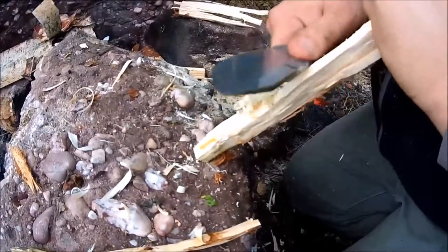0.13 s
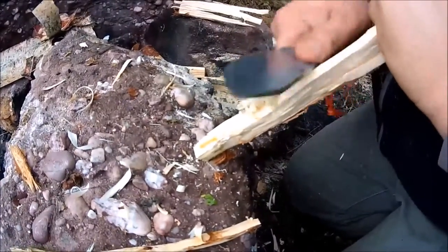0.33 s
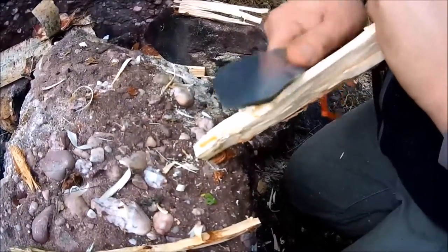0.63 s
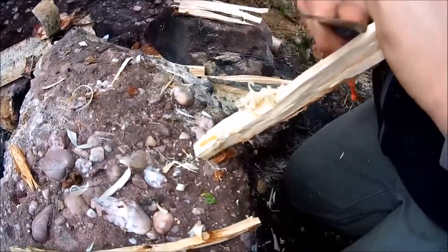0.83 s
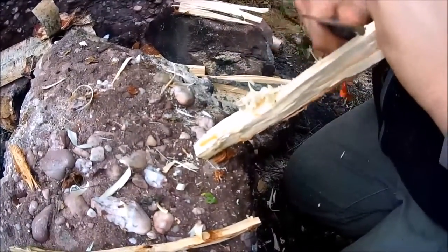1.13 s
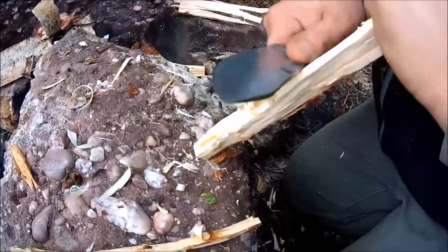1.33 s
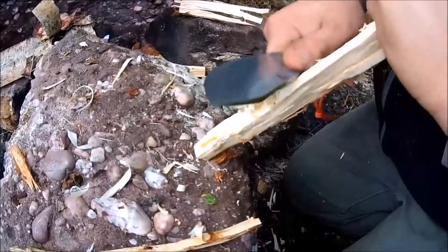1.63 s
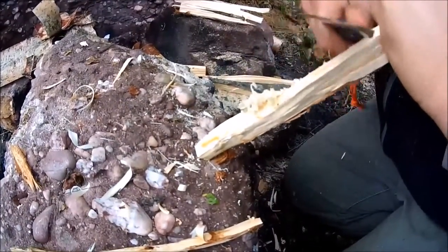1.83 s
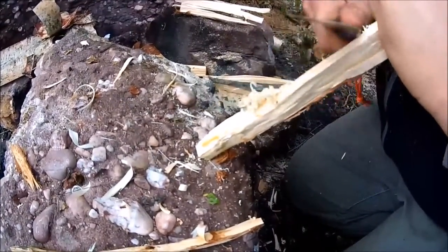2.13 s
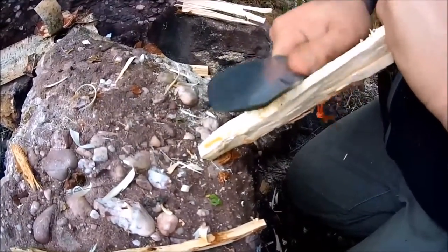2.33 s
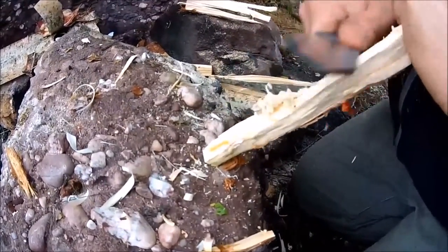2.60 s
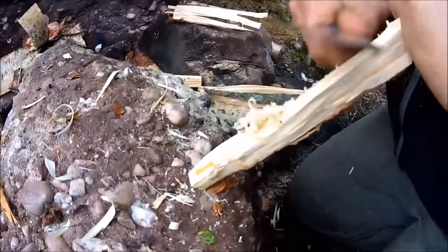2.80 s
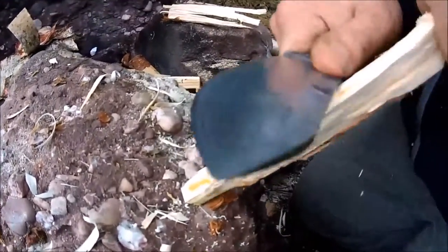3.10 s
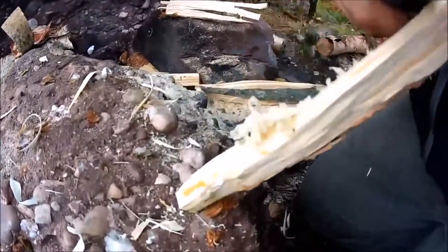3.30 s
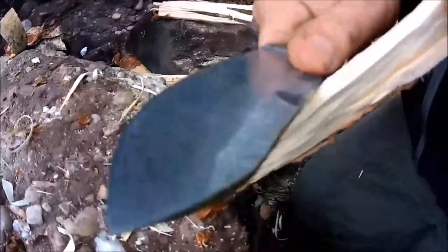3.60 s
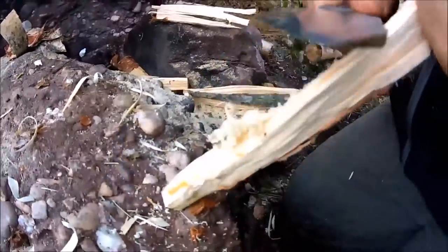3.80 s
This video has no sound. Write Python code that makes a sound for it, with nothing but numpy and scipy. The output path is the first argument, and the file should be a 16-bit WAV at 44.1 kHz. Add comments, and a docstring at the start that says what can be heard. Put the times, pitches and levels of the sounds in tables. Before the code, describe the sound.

Wood being whittled by a blade, quick dry scraping strokes close up, with a late sharp knock

```python
"""A knife shaves a wooden stick outdoors, about six strokes a second, close to the microphone.
Each stroke tears fibres: dense random clicks, coloured by filters, ring the wood and the blade, and flick off shavings.
Catches knock on the stick's damped modes, fibre bundles rip as short rasps, and the stick rocks on its stone.
Grip rustles, splinter snaps and faint air are shaped noise.
Near the end the blade knocks once, hard, and chatters: a noise crack, short modes and a low thump."""
import sys
import numpy as np
from scipy import signal
from scipy.fft import rfft, irfft
from scipy.io import wavfile
from scipy.ndimage import uniform_filter1d

SR = 44100
rng = np.random.default_rng(int(sys.argv[2]) if len(sys.argv) > 2 else 0)


def dump(signal):
    """Clip the signal to [-1, 1] and save it as 16-bit WAV at the path in sys.argv[1]."""
    limited = np.clip(np.atleast_2d(signal).T, -1, 1)
    pcm = np.round(limited * 32767).astype(np.int16)
    wavfile.write(sys.argv[1], SR, pcm)


N = 174195

# knife strokes: touch_s, hardest_s, lift_s, level_db, then treble_db and stick_body_db relative to that level
STROKES = [(-.06, 0.0, 0.031, -6, 1.5, 5), (0.07, 0.156, 0.19, 0.5, -0.5, 5),
           (0.241, 0.279, 0.34, 3, -5, 6.5), (0.358, 0.447, 0.5, 0.5, -0.5, 6.5),
           (0.523, 0.581, 0.63, 0.5, -0.5, 5), (0.654, 0.749, 0.8, 1, 0.5, 5),
           (0.82, 0.879, 0.95, 1, -2.5, 7.5), (0.963, 1.046, 1.109, -0.5, -0.5, 6.5),
           (1.123, 1.174, 1.239, 1.5, -1.5, 7.5), (1.26, 1.376, 1.394, -2, 1, 4.5),
           (1.444, 1.522, 1.56, 2, -5.5, 5.5), (1.577, 1.645, 1.71, -4.5, 3, 4.5),
           (1.66, 1.726, 1.758, 1, -2, 3), (1.774, 1.848, 1.894, 2.5, -3, 5.5),
           (1.953, 2.021, 2.077, 2, 1.5, 5.5), (2.092, 2.179, 2.227, 0, -4.5, 6.5),
           (2.297, 2.389, 2.437, 0, 1.5, 3), (2.469, 2.526, 2.63, 2, -5, 8),
           (2.651, 2.766, 2.78, 0.5, 1.5, 5.5), (2.86, 2.901, 2.98, 2, -3, 8),
           (3.026, 3.132, 3.198, 1.5, -0.5, 7), (3.293, 3.355, 3.406, 3, -3, 8),
           (3.457, 3.557, 3.635, 1, 2, 8), (3.725, 3.78, 3.897, -1.5, -7.5, 12.5)]
BODY_TOP_HZ = 1500  # modes below this belong to the low body
TOP_HZ = 15500  # top of the recorded band


def undb(db):
    """Turn decibels into an amplitude factor."""
    return 10 ** (np.asarray(db) / 20)


def unit(x):
    """Scale to an RMS of 1."""
    return x / np.sqrt(np.mean(x ** 2))


def colour(x, points):
    """Causal minimum-phase filter that follows the shape of (Hz, dB) points, with unit power gain."""
    size = 4096
    hz, db = np.array(points, float).T
    bins_hz = np.fft.rfftfreq(size, 1 / SR) + 1
    log_gain = np.log(undb(np.interp(np.log(bins_hz), np.log(hz), db)))
    # folding the cepstrum forward in time makes the filter causal
    cepstrum = irfft(log_gain)
    cepstrum[1:size // 2] *= 2
    cepstrum[size // 2 + 1:] = 0
    response = irfft(np.exp(rfft(cepstrum)))
    return signal.oaconvolve(x, response / np.linalg.norm(response))[:N]


def walk(rate):
    """Smooth random wander, rate new values a second, with an RMS of 1."""
    hold = max(int(SR / rate), 1)
    steps = np.repeat(rng.standard_normal(N // hold + 1), hold)
    return unit(uniform_filter1d(steps, hold)[:N])


def fade(start, t60):
    """Sudden start and exponential decay, 60 dB down after t60 seconds."""
    out, first = np.zeros(N), int(start * SR)
    age = np.arange(min(int(2 * t60 * SR), N - first))
    out[first + age] = np.exp(-np.log(1000) * age / SR / t60)
    return out


def ring(x, modes):
    """Damped two-pole modes (Hz, dB, t60 s) driven by x."""
    out = 0
    for hz, db, t60 in modes:
        radius = np.exp(-np.log(1000) / (t60 * SR))
        angle = 2 * np.pi * hz / SR
        feed = [0, undb(db) * radius * np.sin(angle)]
        feedback = [1, -2 * radius * np.cos(angle), radius * radius]
        out = out + signal.lfilter(feed, feedback, x + 1e-18)  # tiny offset avoids slow denormals
    return out


def blows(rows):
    """One impulse per (s, dB) row."""
    out = np.zeros(N)
    for s, db in rows:
        out[int(s * SR)] += undb(db)
    return out


def swell(touch, hardest, lift):
    """Pressure builds to its hardest point, falls, and lets go just before the lift."""
    edge_db = -22  # curve level at touch and lift, before the release
    rise_power, fall_power = 2.36, 3  # how round the swell is
    let_go_s, let_go_lead_s = 0.0063, 0.0032  # how fast the edge leaves, how long before the lift
    out = np.zeros(N)
    first = max(int((2 * touch - hardest) * SR), 0)
    last = min(int((2 * lift - hardest) * SR), N)
    span = np.arange(first, last)
    rise = np.maximum((hardest - span / SR) / max(hardest - touch, .01), 0)
    fall = np.maximum((span / SR - hardest) / max(lift - hardest, .01), 0)
    release = .5 + .5 * np.tanh((lift - let_go_lead_s - span / SR) / let_go_s)
    out[span] = release * undb(edge_db * (rise ** rise_power + fall ** fall_power))
    return out


def fibres():
    """Tearing fibres: dense clicks of random sign and uneven size, with an RMS of 1."""
    fibres_per_s, spread_db = 3700, 3.5
    chance, size = rng.random(N), rng.standard_normal(N)
    breaks = np.flatnonzero(np.abs(chance - .5) < .5 * fibres_per_s / SR)
    out = np.zeros(N)
    out[breaks] = np.sign(chance[breaks] - .5) * undb(spread_db * size[breaks])
    return unit(out)


def scraping():
    """Tearing fibres drive the wood, the stick's body and a thin blade ring; each push rocks the stick."""
    # colours of the scrape, its treble, the stick's body and its rocking: pitch_hz, level_db
    scrape_colour = [(400, -30), (800, -9.5), (1000, -3.5), (1420, -3.5), (1700, 1.5), (2150, 1),
                     (2400, -6.5), (2650, -0.5), (3000, -14.5), (6000, -39.5)]
    treble_colour = [(1800, -28), (3000, 0), (4100, 1.5), (4450, -7), (5100, -0.5), (6100, -10),
                     (7000, -16), (9000, -18.5), (12500, -31), (13300, -42.5)]
    body_colour = [(120, 3), (230, -6.5), (340, 1.5), (420, 0.5), (520, 0), (650, -2.5), (850, -8.5),
                   (1600, -43.5)]
    rock_colour = [(30, -6), (60, 9), (110, 0.5), (160, -10.5), (600, -54.5)]
    scrape_db, treble_level_db, body_level_db, rock_db = -67, -68, -76.5, -66.5
    wood_db, blade_db = -75.5, -83.5
    blade_hz, blade_t60_s = 12300, 0.071
    judder_per_s, judder_db = 55, 1  # the edge drags and slips
    grain_db, body_grain_db = 1.2, 2.5  # unevenness of the tearing

    force, treble, body = np.zeros((3, N))
    for touch, hardest, lift, db, treble_db, body_db in STROKES:
        push = swell(touch, hardest, lift)
        force += push * undb(db)
        treble += push * undb(db + treble_db)
        body += push * undb(db + body_db)

    judder = judder_db * walk(judder_per_s)
    grain, fine_grain = (undb(grain_db * walk(220) + judder) for _ in range(2))
    body_grain = undb(body_grain_db * walk(120))
    scrape = undb(scrape_db) * colour(fibres() * force * grain, scrape_colour)
    wood = undb(wood_db + judder) * force * wood_ring()
    hiss = undb(treble_level_db) * colour(fibres() * treble * fine_grain, treble_colour)
    stick = undb(body_level_db) * colour(fibres() * body * body_grain, body_colour)
    rocking = undb(rock_db) * colour(rng.standard_normal(N) * force, rock_colour)
    blade_ring = unit(ring(fibres(), [(blade_hz, 0, blade_t60_s)]))
    blade = undb(blade_db) * blade_ring * treble ** .7
    return scrape + wood + hiss + stick + rocking + blade + shavings(force)


def wood_ring():
    """Each stroke meets the stick at another place, so its resonances shift in pitch and strength."""
    # resonances of the wood under the edge: pitch_hz, level_db, t60_s
    wood_modes = [(1716, -5, .03), (2012, -5, 0.044), (2170, -1.5, 0.031), (2595, -4.5, 0.088),
                  (3445, -10, 0.065), (4080, -7, 0.059), (5053, -9, 0.027)]
    level_shift_db, pitch_shift_share = 2.5, .03  # largest level shift, spread of the pitch shift
    out, drive = np.zeros(N), fibres()
    for touch, _, lift, *_ in STROKES:
        span = slice(max(int(touch * SR), 0), int(lift * SR))
        shifts = rng.standard_normal((len(wood_modes), 2))
        for (hz, db, t60), (level_shift, pitch_shift) in zip(wood_modes, shifts):
            shifted_hz = hz * (1 + pitch_shift_share * pitch_shift)
            level = undb(db + level_shift_db * np.tanh(level_shift))
            out[span] += level * unit(ring(drive[span], [(shifted_hz, 0, t60)]))
    return out


def shavings(force):
    """Single shavings flick off the edge as decaying sines, each with its own pitch, louder under force."""
    flicks_per_s, flick_db, spread_db, t60_s = 170, -66, 3.5, 0.01
    low_hz, high_hz = 1440, 4234
    out, age = np.zeros(N + SR), np.arange(int(t60_s * SR)) / SR
    decay = np.exp(-np.log(1000) * age / t60_s)
    for when, pitch, size in rng.random((int(flicks_per_s * N / SR), 3)):
        first = int(when * N)
        hz = low_hz * (high_hz / low_hz) ** pitch
        excess = min(-np.log(1 - size), 3) - 1  # many small flicks, few large ones
        strength = force[first] * undb(flick_db + spread_db * excess)
        out[first:first + len(age)] += strength * np.sin(2 * np.pi * hz * age) * decay
    return out[:N]


def air():
    """Faint outdoor rumble and hiss: steady coloured noise."""
    # colour of the air: pitch_hz, level_db
    air_colour = [(20, 3), (55, 3.5), (100, -8.5), (200, -18.5), (500, -24.5), (1500, -30.5), (8000, -32.5),
                  (12400, -35), (13000, -45.5), (16000, -51)]
    return undb(-71.5) * colour(rng.standard_normal(N), air_colour)


def rips():
    """Bundles of fibres rip with brief bright rasps: decaying clicks, each centred on its own pitch."""
    # rips: start_s, level_db, brightness_hz
    rip_rows = [(.154, -57.5, 3860), (0.266, -56.5, 1900), (0.319, -60, 3250), (0.451, -53.5, 3800),
                (0.589, -55.5, 2180), (0.758, -56, 2300), (0.905, -65, 2400), (1.19, -61, 2200),
                (1.828, -54.5, 1990), (2.039, -53.5, 2920), (2.408, -58.5, 2200), (2.893, -56.5, 1750),
                (3.07, -59, 3100)]
    t60_s = 0.029
    grain = fibres()
    out = np.zeros(N)
    for s, db, hz in rip_rows:
        rasp_colour = [(hz / 2, -15), (hz, 0), (hz * 1.13, -9), (hz * 4, -40)]
        out += undb(db) * colour(grain * fade(s, t60_s), rasp_colour)
    return out


def catches():
    """The edge catches and knocks the stick; its low modes shift with the place of the edge."""
    # catches: start_s, level_db, body_pitch_ratio
    catch_rows = [(.319, -54, 1.2), (.447, -51.5, 1), (0.736, -50.5, 1.03), (.861, -52.5, .7),
                  (1.043, -49, 1.1), (1.353, -49.5, 1.13), (1.524, -50.5, 0.9), (1.709, -50.5, 1),
                  (2.022, -51, 1.2), (2.388, -47, 0.92), (2.741, -52, 0.79), (2.901, -46.5, 0.89),
                  (2.942, -45, 0.93), (3.15, -51, 0.93), (3.379, -46, 1.03), (3.574, -47.5, 1.06),
                  (3.785, -43.5, 0.87)]
    # modes of the stick: pitch_hz, level_db, t60_s
    stick_modes = [(215, -21, 0.031), (355, -12.5, 0.036), (516, -7.5, 0.034), (2250, -14, 0.01),
                   (3900, -22, 0.0054)]
    out = np.zeros(N)
    for s, db, pitch in catch_rows:
        modes = [(hz * pitch if hz < BODY_TOP_HZ else hz, gain_db, t60)
                 for hz, gain_db, t60 in stick_modes]
        out += ring(blows([(s, db)]), modes)
    return out


def handling():
    """The hand shifts its grip: soft rustles of swelling noise."""
    # rustles: start_s, strongest_s, end_s, level_db
    rustle_rows = [(2.177, 2.243, 2.4, -79.5), (2.55, 2.638, 3.07, -80), (3.837, 3.943, 4, -76.5)]
    # colour of the rustles: pitch_hz, level_db
    rustle_colour = [(100, -1.5), (400, 0), (1000, -3), (2000, -9), (5000, -17), (12000, -42)]
    strength = sum(undb(db) * swell(start, strongest, end) for start, strongest, end, db in rustle_rows)
    return colour(rng.standard_normal(N) * strength, rustle_colour)


def splinters():
    """Splinters snap as short dry noise bursts, the loudest led in by a dragging splinter."""
    # snaps: start_s, level_db, brightness_hz
    snap_rows = [(2.5917, -51, 4600), (3.0804, -40.5, 2960)]
    # colour of the drag: pitch_hz, level_db
    snag_colour = [(1500, -26), (2500, 3), (3400, 5), (5000, -7), (14000, -34)]
    snap_t60_s = 0.014
    snag_s, snag_db = (3.04, 3.078, 3.09), -64.5  # start, strongest, end
    snaps = np.zeros(N)
    for s, db, hz in snap_rows:
        snap_colour = [(hz / 3, -18), (hz * 0.95, 0), (hz * 1.04, -1), (hz * 2, -14), (hz * 4, -26)]
        snaps += undb(db) * colour(rng.standard_normal(N) * fade(s, snap_t60_s), snap_colour)
    return snaps + undb(snag_db) * colour(fibres() * swell(*snag_s), snag_colour)


def soften(x, hz):
    """A soft contact excites little above hz: a steep low-pass."""
    return signal.sosfilt(signal.butter(4, hz, fs=SR, output="sos"), x + 1e-18)


def knock():
    """The blade hits and chatters, the last bounces duller: a crack, short modes and a low stick thump."""
    # the hard knock, then its softer chatter: start_s, level_db, low_body_db, contact_top_hz
    knock_rows = [(3.4888, 4.5, 0, 15040), (3.4908, -14, -12, 14980), (3.4946, -13, -11.5, 4750),
                  (3.496, -15.5, -14.5, 3200), (3.4982, -14.5, -14.5, 4770)]
    # modes of blade and stick pressed together: pitch_hz, level_db, t60_s
    knock_modes = [(166.2, -29, 0.03), (280, -29, 0.028), (523, -15, 0.0088), (717, -24.5, .009),
                   (2080, -39.5, 0.0062), (2310, -31.5, 0.025), (3182, -21.5, 0.014), (4016, -32, 0.016),
                   (4130, -17.5, 0.021), (4640, -24.5, 0.022), (4580, -13, 0.01), (5670, -20, 0.0085),
                   (9400, -34, 0.0039)]
    # colour of the crack: pitch_hz, level_db
    crack_colour = [(300, -8.5), (1600, -13.5), (2500, -3.5), (6000, -3), (7400, -10), (8900, -12.5),
                    (9300, -5), (11000, -11), (15000, -12)]
    contact_s = 0.00077  # rise time of the first contact
    crack_db, crack_t60_s = -33.5, 0.0077
    tail_db, tail_t60_s = -51.5, 0.056
    thump_hz, thump_db, thump_t60_s, thump_lag_s = 53.5, -26, 0.07, 0.0045

    first = knock_rows[0][0]
    noise = rng.standard_normal(N)
    crack, low_blows, high_blows = np.zeros((3, N))
    for s, db, body_db, hz in knock_rows:
        crack += soften(undb(crack_db + db) * fade(s, crack_t60_s) * noise, hz)
        low_blows += soften(blows([(s, db + body_db)]), hz)
        high_blows += soften(blows([(s, db)]), hz)
    crack += undb(tail_db) * fade(first, tail_t60_s) * noise
    low = ring(low_blows, [mode for mode in knock_modes if mode[0] < BODY_TOP_HZ])
    high = ring(high_blows, [mode for mode in knock_modes if mode[0] >= BODY_TOP_HZ])
    contact = np.clip((np.arange(N) / SR - first) / contact_s, 0, 1)
    thump = ring(blows([(first + thump_lag_s, 0)]), [(thump_hz, thump_db, thump_t60_s)])
    return contact * (low + high + colour(crack, crack_colour)) - thump


def scene():
    """Sum all sources into one channel."""
    knife = scraping() + rips() + catches() + splinters() + knock()
    return (knife + handling() + air())[None]


def record(dry):
    """The recorder cuts the top and sits slightly off zero."""
    dc_offset = -.0041  # of full scale
    top_cut = signal.ellip(8, .2, 70, TOP_HZ, fs=SR, output="sos")
    return signal.sosfilt(top_cut, dry) + dc_offset


dry = scene()
out = record(dry)
dump(out)
```